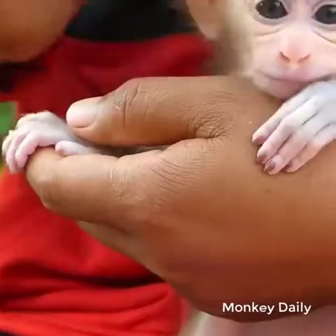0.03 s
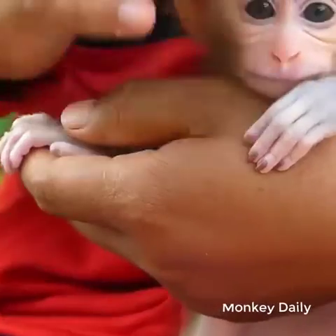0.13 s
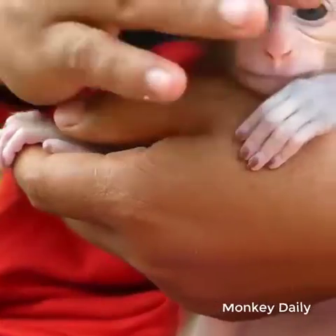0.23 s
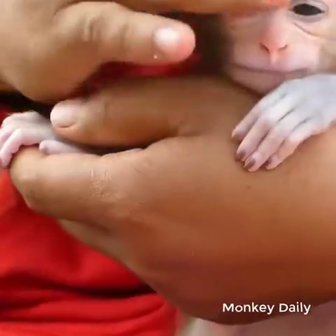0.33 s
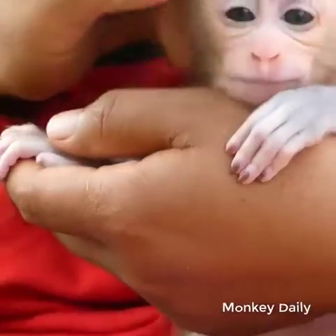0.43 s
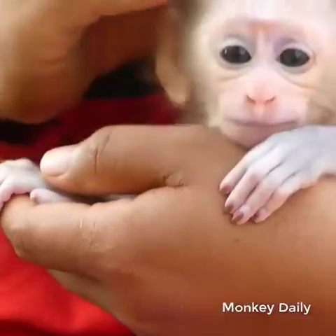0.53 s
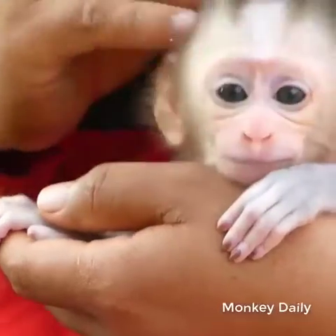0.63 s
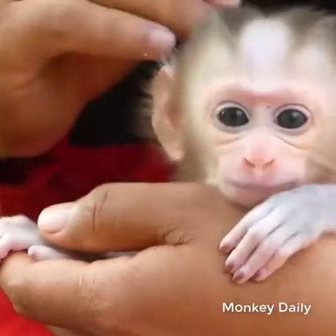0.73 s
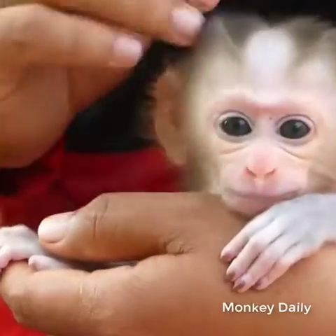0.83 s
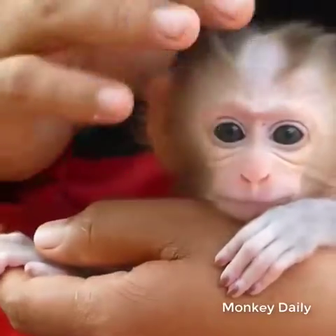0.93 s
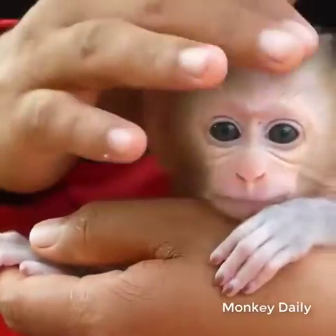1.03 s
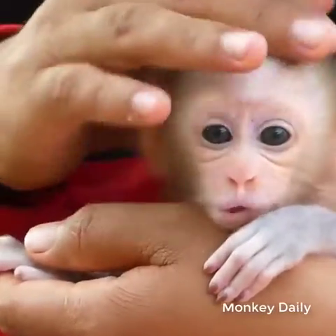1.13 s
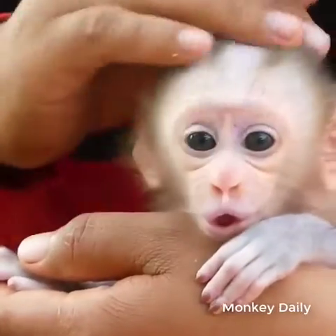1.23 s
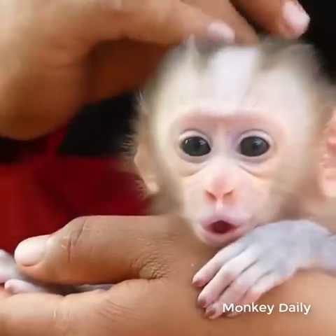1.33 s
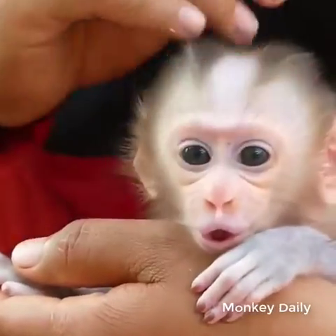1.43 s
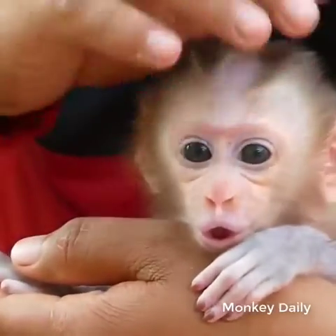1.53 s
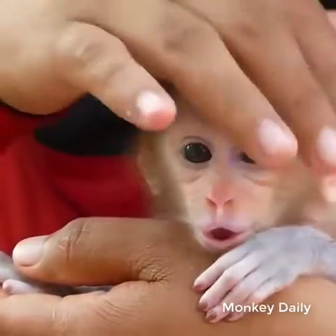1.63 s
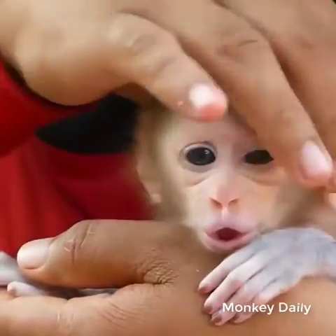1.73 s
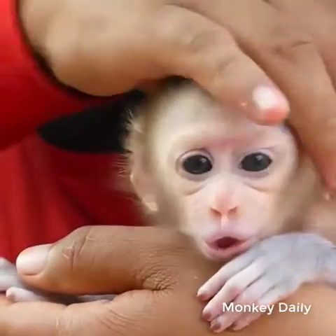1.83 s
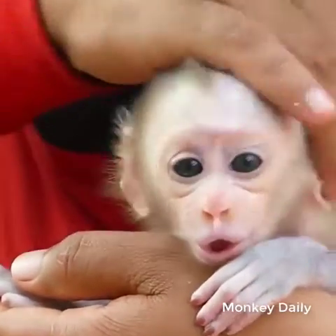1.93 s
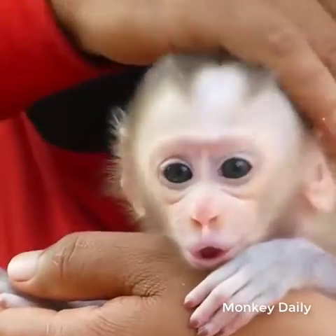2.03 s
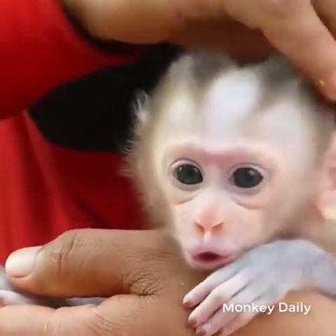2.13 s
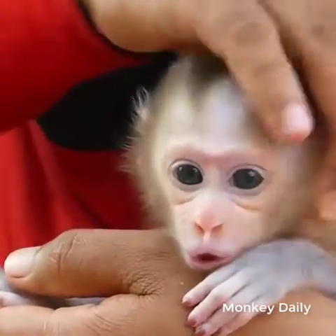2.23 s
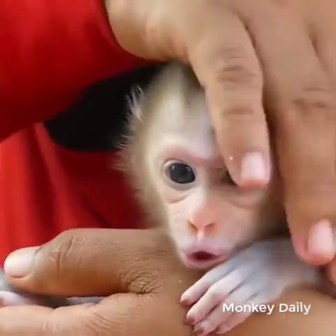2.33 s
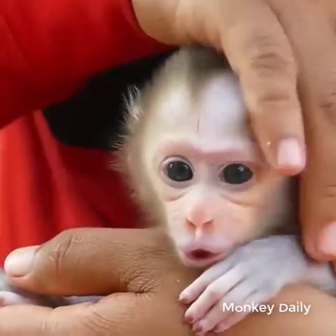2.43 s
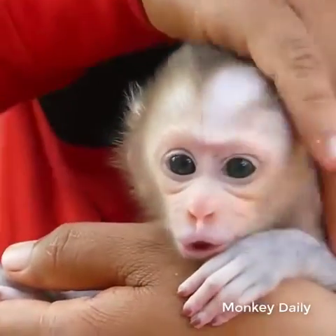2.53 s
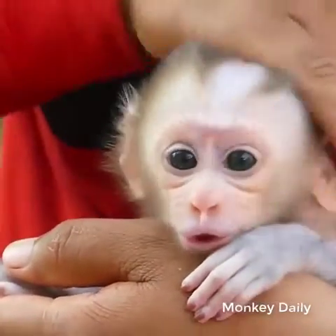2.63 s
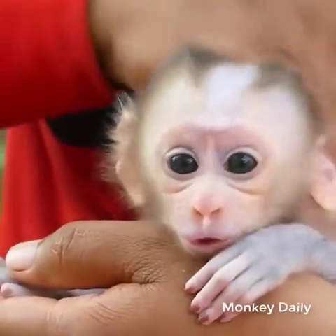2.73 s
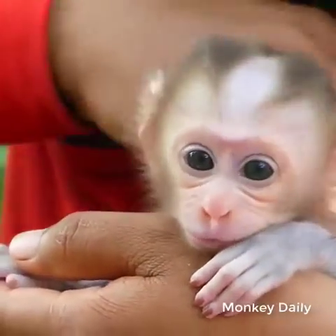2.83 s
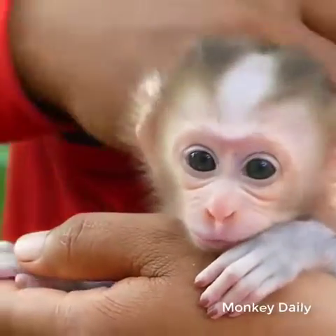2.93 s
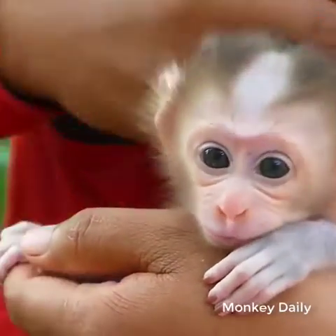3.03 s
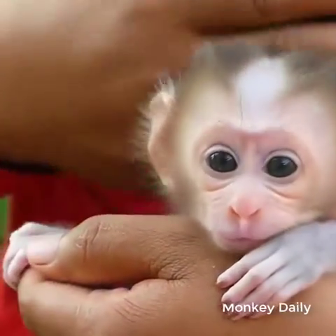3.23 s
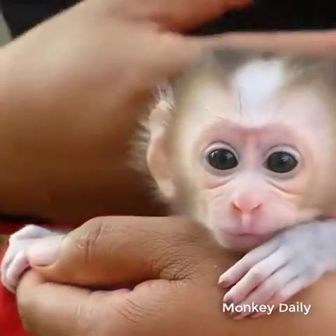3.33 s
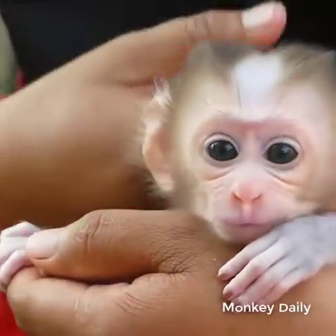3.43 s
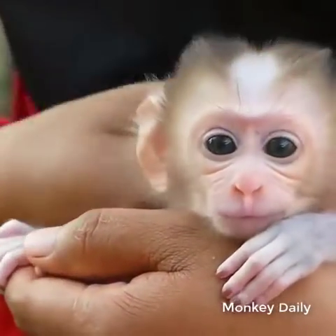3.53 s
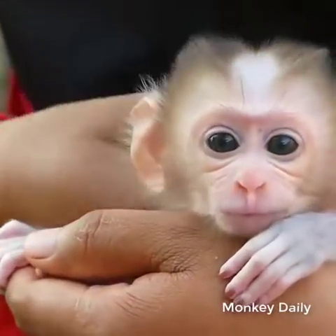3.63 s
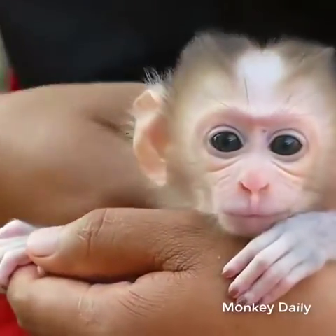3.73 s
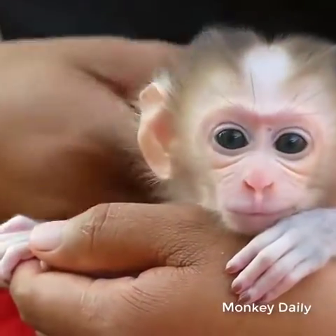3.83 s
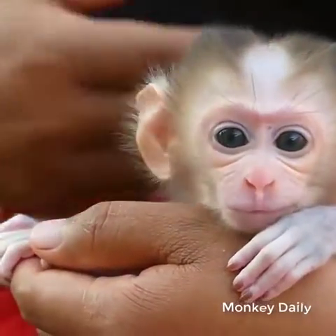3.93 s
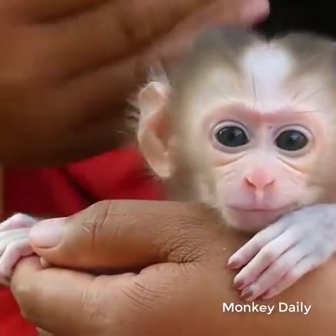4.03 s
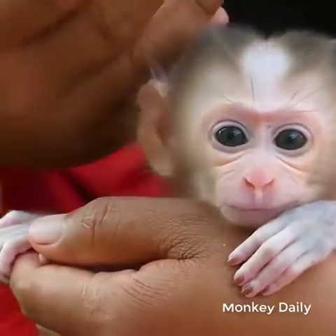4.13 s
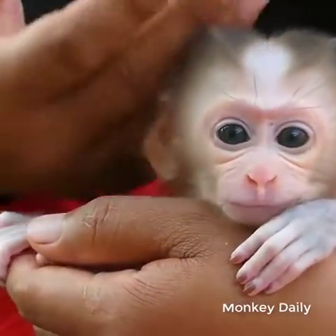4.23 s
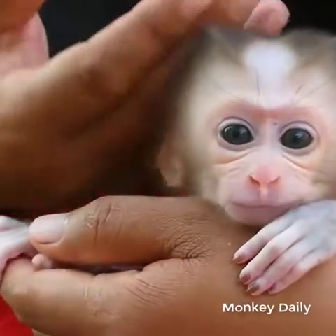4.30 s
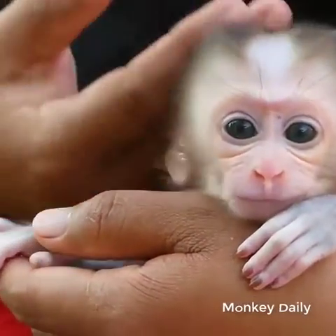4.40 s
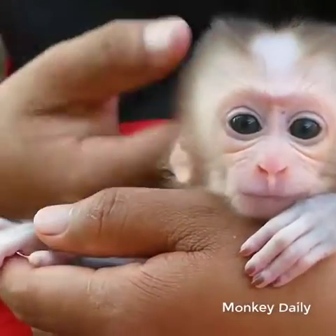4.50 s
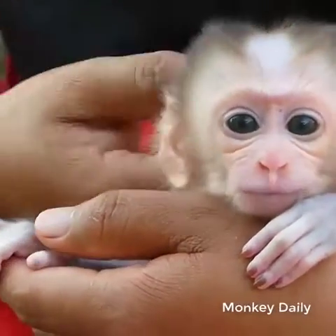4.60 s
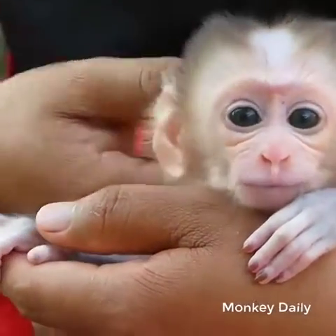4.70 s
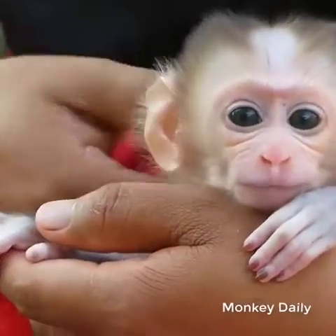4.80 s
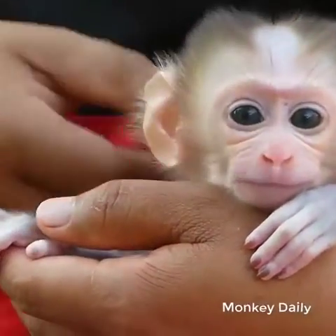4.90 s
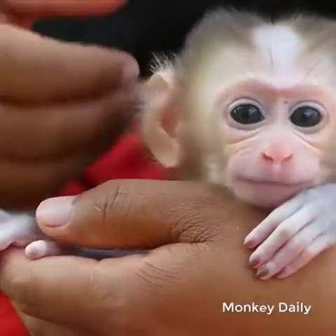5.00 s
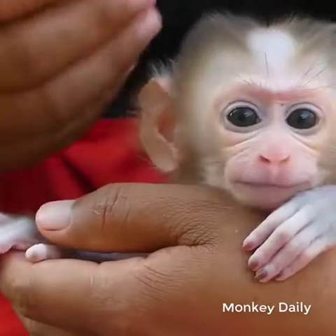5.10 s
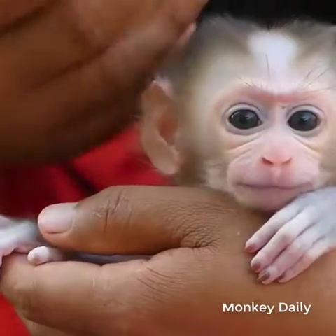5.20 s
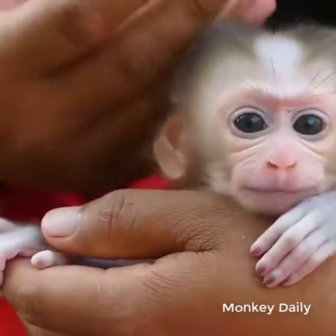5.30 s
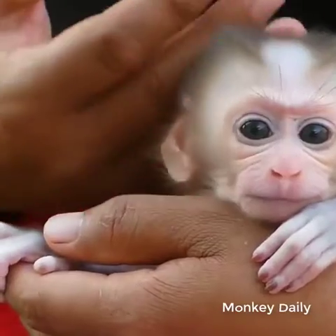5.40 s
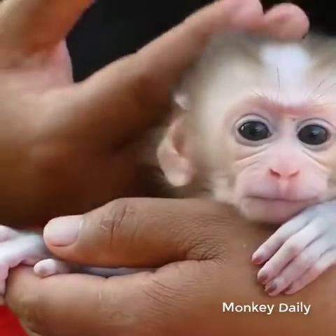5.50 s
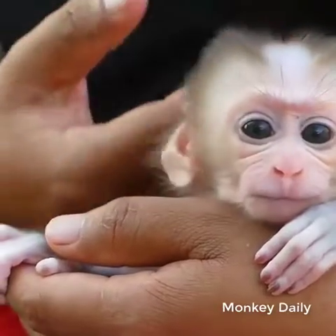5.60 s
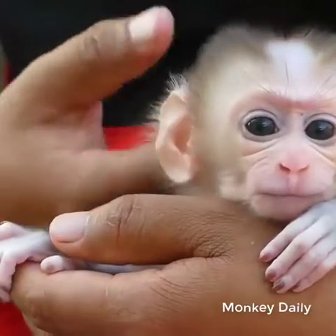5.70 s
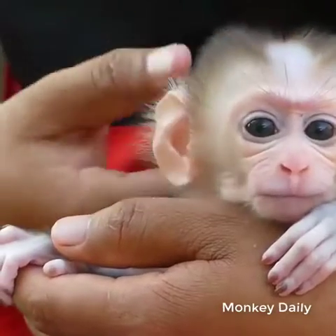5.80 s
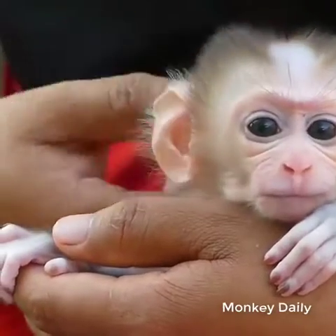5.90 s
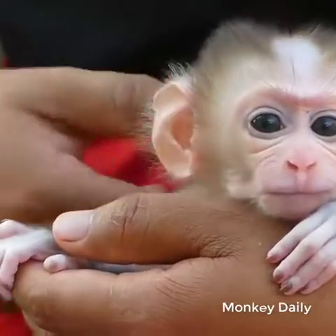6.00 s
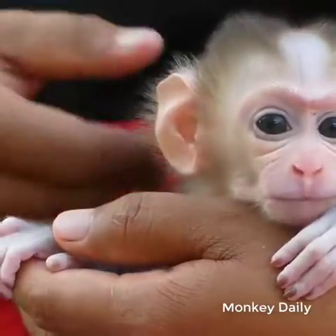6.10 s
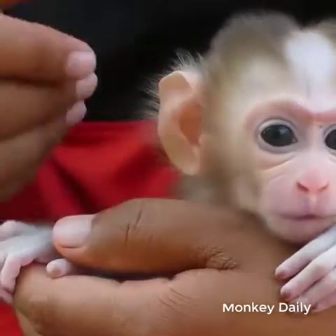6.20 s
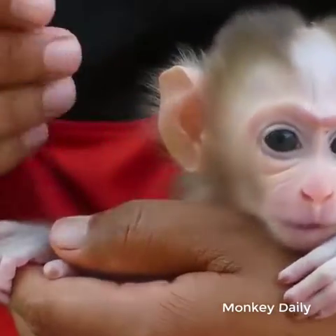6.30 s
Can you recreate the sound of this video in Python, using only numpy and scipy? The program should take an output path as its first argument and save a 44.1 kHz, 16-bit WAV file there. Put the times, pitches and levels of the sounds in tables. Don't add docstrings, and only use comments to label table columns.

```python
import sys
import numpy as np
from scipy import signal
from scipy.fft import irfft, next_fast_len
from scipy.io import wavfile
from scipy.ndimage import uniform_filter1d

SR = 44100
rng = np.random.default_rng(int(sys.argv[2]) if len(sys.argv) > 2 else 0)


def makeup_ratio(level_db):
    decades = np.asarray(level_db, float) / 20
    return 10 ** decades


def transcribe(signal):
    frames = np.atleast_2d(signal).T
    limited = np.clip(frames, -1, 1)
    pcm = np.round(limited * 32767).astype(np.int16)
    wavfile.write(sys.argv[1], SR, pcm)


N = 280035
TIME = np.arange(N) / SR
SIZE = next_fast_len(N)
BINS_HZ = np.arange(SIZE // 2 + 1) * SR / SIZE
SIDES = np.array([[1], [-1]])


def unit(x):
    return x / np.sqrt(np.mean(x ** 2))


def shaped(gain):
    used = np.flatnonzero(gain > gain.max() / 1e4)
    spectrum = np.zeros(len(gain), complex)
    spectrum[used] = gain[used] * (rng.standard_normal((len(used), 2)) @ [1, 1j])
    return unit(irfft(spectrum, SIZE)[:N])


def noise(hz, width):
    return shaped(np.exp(-((BINS_HZ - hz) / width) ** 2 * 2))


def colour(table, hz):
    f, db = np.transpose(table)
    return np.interp(np.log(hz), np.log(f), db)


def resonances(modes, hz, power=1):
    return sum(makeup_ratio(db / power) / (1 + (2 * (hz - f) / width) ** 2) for f, width, db in modes) ** power


def phrase(tables, join_s, fade_s):
    s, *columns = np.transpose(np.concatenate(tables))
    gate = np.zeros(N)
    for rows in tables:
        start_s, end_s = rows[0][0] - join_s, rows[-1][0] + join_s
        gate[int(start_s * SR):int(end_s * SR)] = 1
    return uniform_filter1d(gate, int(fade_s * SR)), [np.interp(TIME, s, c) for c in columns]


def swell(s, length, rise):
    u = (TIME - s) / length
    ramp = np.minimum(u / rise, (1 - u) / (1 - rise))
    return np.sin(np.pi / 2 * np.clip(ramp, 0, 1)) ** 2


def whistles(table, wobble):
    out = np.zeros(N)
    for s, db, start_hz, end_hz, length in table:
        glide = np.interp(TIME, [s, s + length], [start_hz, end_hz])
        hz = glide * (1 + wobble * noise(0, 130))
        tone = np.sin(2 * np.pi * np.cumsum(hz) / SR)
        out += makeup_ratio(db) * np.sqrt(swell(s, length, 0.36)) * tone
    return out


def yard(x, wet_db, t60):
    t = TIME[:SR // 2]
    decay = np.exp(-np.log(1000) * t / t60) * np.minimum(t / 0.017, 1)
    tail = rng.standard_normal((2, len(t))) * decay
    dull = signal.butter(1, 6000, fs=SR)
    tail = signal.lfilter(*dull, tail[0] + .33 * tail[1] * SIDES)
    tail = tail / np.sqrt(np.sum(tail[0] ** 2))
    return x + makeup_ratio(wet_db) * signal.fftconvolve(x[None], tail)[:, :N]


def air():
    # (frequency [Hz], density [dB per Hz])
    hiss_tint = [(25, -38), (75, -28), (100, -8), (150, -3), (300, -9.5), (500, -8.5), (1200, -17.5),
                 (2300, -22.5), (4500, -20), (7200, -22.5), (7600, -27.5), (8100, -26.5), (10100, -23),
                 (10700, -19), (14900, -25), (15300, -26.5)]
    # (frequency [Hz], side minus mid [dB])
    spread = [(30, -5), (60, -24.5), (110, -16), (200, -2.5), (380, 1.5), (1300, 2), (2400, 3), (3400, -6),
              (5000, -31), (7000, -18), (8500, -2), (10000, 0), (12500, -15.5), (15000, -28.5)]
    # (frequency [Hz], width [Hz], level [dB])
    hum_lines = [(105, 32, -70.5), (146.4, 14, -68)]
    hiss_db, top_hz = -54.5, 15750
    out, drift = 0, noise(0, 1.5)
    tint = makeup_ratio(colour(hiss_tint, BINS_HZ + 1)) * (BINS_HZ < top_hz)
    for hz in 30 * 2 ** np.arange(0, 9.1, .5):
        gain = tint * np.exp(-(np.log2((BINS_HZ + 1) / hz) * 2) ** 2)
        pair = shaped(gain) + makeup_ratio(colour(spread, hz)) * shaped(gain) * SIDES
        flicker = makeup_ratio(.7 * drift + 2.2 * noise(0, 5.2))
        out = out + flicker * np.linalg.norm(gain) * pair
    hum = sum(makeup_ratio(db) * noise(hz, width) for hz, width, db in hum_lines)
    return makeup_ratio(hiss_db) * unit(out) + hum


def far_cock():
    # (time [s], level [dB], start pitch [Hz], end pitch [Hz], length [s])
    calls = [(3.24, -58, 784, 770, 0.033), (3.48, -64, 980, 985, 0.15), (3.6, -58.5, 812, 824, 0.045),
             (3.75, -69, 695, 670, 0.45), (4.1, -65, 616, 595, 0.14), (4.3, -65.5, 1231, 1100, 0.17),
             (4.66, -58.5, 816, 793, 0.037), (4.7, -69, 1160, 1136, 0.052), (4.93, -68, 1003, 1000, 0.16),
             (4.96, -63.5, 1660, 1730, 0.048), (5.2, -59, 502, 496, 0.068)]
    return yard(whistles(calls, 0.01115), 0, 0.93)


def birds():
    # (time [s], level [dB], start pitch [Hz], end pitch [Hz], length [s])
    chirps = [(.13, -64, 3200, 3200, .03), (.895, -59, 3400, 3200, .02), (2.25, -56, 4000, 4000, .04),
              (2.83, -60, 5700, 5600, .03), (2.86, -57, 4400, 3900, .03), (2.87, -59, 2900, 2900, .05),
              (3.108, -60, 2300, 2850, .022), (3.115, -59, 4400, 4500, .03), (3.12, -54, 2950, 3750, .02),
              (3.51, -57, 3900, 4600, .03), (3.69, -60, 5250, 5300, .03), (4.48, -56, 3700, 3900, .03),
              (4.485, -56, 4500, 4800, .03), (4.82, -60, 2800, 2300, .03), (4.845, -56, 4200, 2900, .05),
              (5.06, -56, 4500, 4300, .04), (5.09, -57, 3000, 3300, .03), (5.18, -58, 4500, 4400, .05),
              (5.82, -51, 4600, 4500, .04)]
    return makeup_ratio(2.5) * yard(whistles(chirps, .025), -2, .22)


def cock():
    # (time [s], throat pulse rate [Hz], level [dB], mouth opening [dB])
    crow = [
        [(5.634, 780, -51.5, 4), (5.66, 771.1, -34, -4.5), (5.7, 760, -31.5, 2.5), (5.748, 754, -31, -11),
         (5.77, 755.3, -39, -11), (5.8, 770.3, -42, -15)],
        [(5.893, 760, -51.5, 10), (5.91, 770.8, -36, 5), (5.93, 809.3, -25, -11), (5.962, 843.6, -23.5, -26),
         (6.025, 815, -24, -11), (6.05, 813.6, -37, 0), (6.09, 800, -44, 0)],
        [(6.13, 760, -42.5, 7), (6.175, 755, -40.5, 15), (6.22, 759, -31.5, 4.5), (6.255, 795, -30.5, -6),
         (6.3, 789.3, -28.5, -4), (6.35, 760, -28, -17)],
    ]
    # (frequency [Hz], width [Hz], level [dB])
    beak = [(1181, 280, -12.5), (1593, 325, -1.5), (1932, 220, -20.5), (2467, 530, -48.5), (3017, 430, -10),
            (4215, 240, -27.5), (5103, 250, -21), (6276, 1600, -27.5), (9040, 3300, -29.5),
            (12500, 700, -40.5), (13900, 2100, -34.5), (645, 800, -21)]
    # (unevenness of the pulses [0-1], hoarseness [0-1], chest line [dB])
    throats = [
        (0.94, 0.54, -15.5),
        (0.22, .3, -10.5),
        (0.98, .6, -16),
    ]
    gate, (hz, db, mouth_db) = phrase(crow, 0.0027, 0.0108)
    syllable = np.searchsorted([rows[0][0] for rows in crow[1:]], TIME)
    uneven, hoarse, chest_db = np.transpose(throats)[:, syllable]
    half = hz / 2 * (1 + .018 * noise(0, 70))
    turn = 2 * np.pi * np.cumsum(half) / SR
    voice = 0
    for k in range(2, 20):
        flutter = 1 + hoarse * 2.24 * noise(0, 90)
        tract = makeup_ratio(chest_db + 3.5) if k == 2 else resonances(beak, k * half, power=1.1)
        pulse = uneven if k % 2 else 1
        voice = voice + flutter * tract * pulse * np.sin(k * turn + k * k)
    rasp = shaped(resonances(beak, BINS_HZ, power=1.2) * (BINS_HZ > 250)) * makeup_ratio(1.97 * noise(0, 130))
    mouth = makeup_ratio(mouth_db - 9.0) * noise(2030, 150)
    low_cut = signal.butter(3, 400, "high", fs=SR, output="sos")
    call = signal.sosfilt(low_cut, 0.62 * voice + 0.93 * hoarse * rasp + mouth)
    return yard(gate * makeup_ratio(db) * call, -8, 0.33)


def pants():
    # (time [s], level [dB], centre [Hz], length [s])
    puffs = [(.005, -54.5, 4800, 0.049), (0.208, -55.5, 4570, 0.075), (0.647, -57, 1110, 0.17),
             (0.878, -57.5, 4330, 0.04), (0.935, -58, 2470, 0.24), (1.015, -57.5, 5100, 0.11),
             (1.175, -53, 3800, 0.23), (1.797, -55.5, 3966, 0.2), (1.9, -44, 3420, 0.009),
             (2.218, -52.5, 4220, 0.14), (2.661, -60.5, 3000, 0.07), (2.827, -54, 4200, 0.16),
             (3.296, -59, 3570, .036), (3.472, -56, 4270, 0.18), (3.676, -58, 4140, 0.14),
             (4.327, -61.5, 3940, 0.028), (4.44, -57.5, 4560, 0.15), (4.838, -60, 2650, .13),
             (5.034, -53.5, 4070, 0.13), (5.796, -50.5, 4040, 0.087)]
    width_hz = 2500
    out = np.zeros(N)
    for s, db, hz, length in puffs:
        streaks = makeup_ratio(3.2 * np.interp(BINS_HZ, np.arange(80) * 220, rng.standard_normal(80)))
        bell = np.exp(-((BINS_HZ - hz) / width_hz) ** 2 * 2)
        burst = shaped(streaks * (BINS_HZ > 150) * bell)
        grain_db = 2.5 * noise(0, 120.8)
        out += makeup_ratio(db + grain_db) * swell(s, length, 0.25) * burst
    return yard(out, -5.5, 0.1)


def monkey():
    # (time [s], pitch [Hz], level [dB], fold press [dB])
    strained_coo = [(1.22, 850, -63.5, -71.5), (1.24, 920, -29.5, -53.5), (1.265, 1055, -25, -54.5),
                    (1.29, 1090, -18.5, -45), (1.31, 1111, -15, -37), (1.335, 1156, -13.5, -45.5),
                    (1.362, 1207, -10.5, -48.5), (1.385, 1196, -12, -47)]
    # (time [s], pitch [Hz], level [dB], fold press [dB])
    cracked_tail = [(1.394, 1179, -13.5, -51), (1.405, 990, -29, -42), (1.423, 979, -25, -43.5),
                    (1.434, 1105, -23, -46), (1.458, 965, -26.5, -51.5), (1.47, 892, -40.5, -55)]
    # (time [s], pitch [Hz], level [dB], fold press [dB])
    calm_coos = [
        [(1.614, 887, -56, -61), (1.633, 922, -20, -49.5), (1.655, 1067, -20, -47.5), (1.7, 1103, -16.5, -48),
         (1.73, 1108, -14.5, -40), (1.764, 1038, -26.5, -47.5), (1.776, 908, -30.5, -55),
         (1.783, 849, -62, -53)],
        [(1.977, 805, -56.5, -63), (1.999, 889, -26.5, -51.5), (2.025, 950, -21.5, -55),
         (2.058, 1028, -25, -46.5), (2.089, 1077, -19.5, -44), (2.112, 1061, -23, -43),
         (2.127, 1044, -23.5, -48), (2.138, 914, -34.5, -52), (2.144, 867, -65, -67)],
        [(2.36, 772, -57, -68), (2.378, 864, -29, -56.5), (2.4, 920, -21.5, -57), (2.45, 982, -21, -52),
         (2.483, 1010, -20.5, -53.5), (2.515, 981, -21, -51.5), (2.529, 907, -29.5, -50),
         (2.536, 840, -50, -64)],
    ]
    # (time [s], half length [s], level loss [0-1], pitch drop [share])
    slips = [
        (1.3895, .0025, .95, .1),
        (1.4015, .002, .8, .03),
    ]
    # (frequency [Hz], gain over the press [dB])
    second_partial = [(1700, -12), (1880, -6.5), (1990, 8.5), (2150, 8), (2250, 1), (2420, -2)]
    third_partial = [(2600, -20.5), (2850, -5.5), (3050, 16.5), (3300, 17.5), (3450, 18), (3620, 14.5)]
    fourth_partial = [(3200, -2), (3500, 5.5), (3760, -13), (4050, -6.5), (4350, 2), (4820, 0)]
    # (frequency [Hz], width [Hz], level over the top ring [dB])
    upper_throat = [(3350, 440, 15), (4440, 530, -5.5), (6500, 4300, -12.5), (8800, 350, -0.5),
                    (9700, 590, -18), (10886, 700, -9.5), (13000, 3000, -20.5)]
    rest_press_db, strain_end_s = -48.5, 1.48
    gate, (hz, db1, top_db) = phrase([strained_coo, cracked_tail, *calm_coos], 0.005, .006)
    press = top_db - rest_press_db
    db2 = rest_press_db + .6 * press + colour(second_partial, 2 * hz)
    tongue_db = -24 * np.exp(-((TIME - 1.731) / 0.014) ** 2)
    db3 = rest_press_db + .9 * press + colour(third_partial, 3 * hz) + tongue_db
    fall = np.minimum(np.gradient(hz) * SR + 2600, 0)
    slack_db = uniform_filter1d(.003 * fall, size=200)
    ladder_db = rest_press_db + 0.86 * press - 1.5 + slack_db
    for s, half, loss, drop in slips:
        slip = np.exp(-((TIME - s) / half) ** 2)
        gate, hz = gate * (1 - loss * slip), hz * (1 - drop * slip)
    tremor = 1 + .002 * noise(0, 120)
    hz = uniform_filter1d(hz, size=150) * tremor
    turn = 2 * np.pi * np.cumsum(hz) / SR
    voice = sum(makeup_ratio(db) * np.sin(k * turn) for k, db in ((1, db1), (2, db2), (3, db3)))
    db4 = rest_press_db + .45 * press + colour(fourth_partial, 4 * hz) + slack_db
    voice += makeup_ratio(db4) * (1 + .3 * noise(0, 120)) * np.sin(4 * turn)
    for k in range(5, 15):
        shimmer = .75 + .075 * k * noise(0, 230)
        tract = resonances(upper_throat, k * hz) ** 1.1
        voice += makeup_ratio(ladder_db) * shimmer * tract * np.sin(k * turn)
    breath = makeup_ratio(db3 - 24) * noise(2800, 2000)
    breath += makeup_ratio(top_db - 7.0) * noise(4442, 3000)
    breath += makeup_ratio(db1 - 43) * noise(1200, 900)
    breath += makeup_ratio(db1 - 36) * (TIME < strain_end_s) * noise(3600, 2200)
    ring = makeup_ratio(top_db - 3.0) * (noise(8660, 70) + .4 * SIDES * noise(10000, 300))
    calm = TIME > strain_end_s
    hiss = makeup_ratio(top_db - 3.5 - 18.5 * calm) * noise(9500, 1000)
    hiss += makeup_ratio(top_db - 10.5 - 6 * calm) * noise(11500, 3000)
    room = yard(gate * (np.sqrt(2) * voice + breath), -23, .17)
    return room + gate * (ring + hiss)


def scene():
    return air() + far_cock() + birds() + cock() + pants() + monkey()


def thin_masked(x):
    # (frequency [Hz], width [Hz], frailty [dB])
    frail = [(3720, 260, 22), (4680, 310, 23), (5650, 390, 25.5), (7500, 260, 20), (9900, 800, 18),
             (11300, 250, 21), (12200, 250, 21), (13000, 300, 21), (15300, 500, 21)]
    under_db, reach_bands, whim_db, busy_db = 11., 3., 2.5, -62.
    spectrum = signal.stft(x, nperseg=1024)[2]
    power = uniform_filter1d(np.abs(spectrum[:, :512]).mean(0) ** 2, size=3, axis=1)
    band_db = 10 * np.log10(np.abs(power.reshape(128, 4, -1).mean(1)) + 1e-14)
    near = np.exp(-np.abs(np.arange(-20, 21)) / reach_bands)[:, None]
    mask = signal.fftconvolve(makeup_ratio(band_db / 2), near / near.sum(), mode="same", axes=0)
    mask_db = 40 * np.log10(np.abs(mask))
    busy = np.clip((band_db.max(0) - busy_db) / 10, .3, 1)
    frail_db = resonances(frail, (np.arange(128)[:, None] + .5) * SR / 256) * busy
    frames = band_db.shape[1]
    whim = np.repeat(rng.standard_normal((128, frames // 6 + 1)), 6, axis=1)[:, :frames]
    keep = np.clip((band_db - mask_db + under_db - frail_db + whim_db * whim) / 2, 0, 1)
    keep[:13] = 1
    spectrum[:, :512] *= np.repeat(keep, 4, axis=0)
    return signal.istft(spectrum, nperseg=1024)[1][:, :N]


def top_cut(x):
    return signal.sosfilt(signal.butter(12, 15950, fs=SR, output="sos"), x)


def record(dry):
    mix = thin_masked(dry)
    return top_cut(mix)


dry = scene()
out = record(dry)
transcribe(out)
```